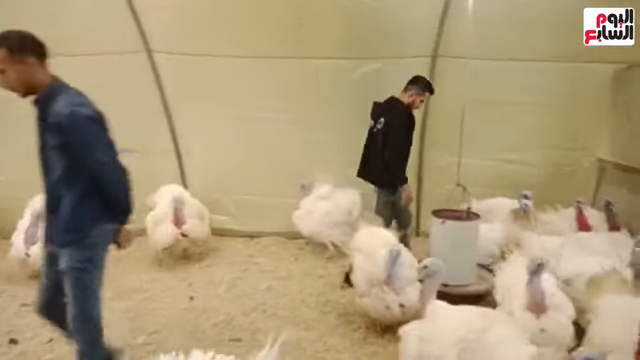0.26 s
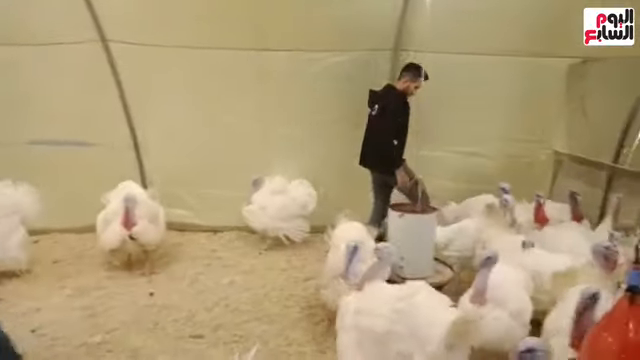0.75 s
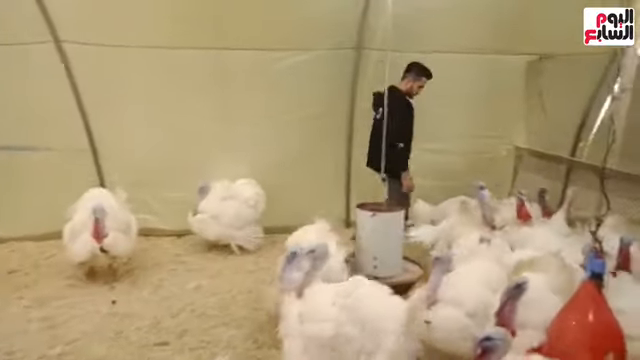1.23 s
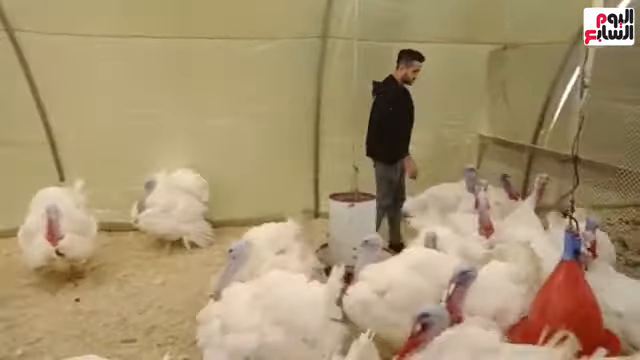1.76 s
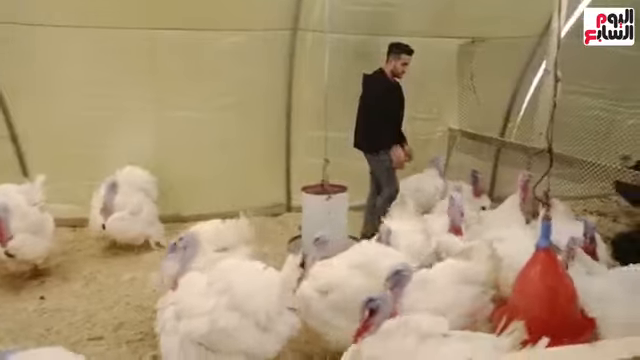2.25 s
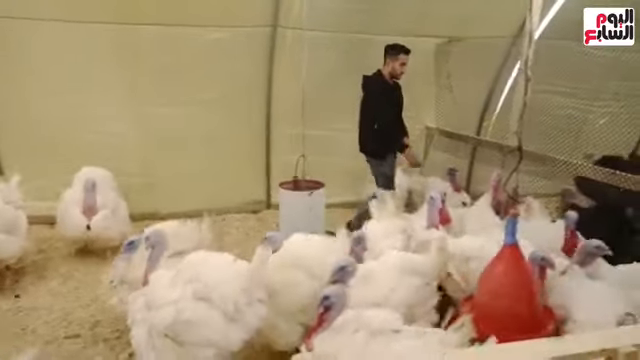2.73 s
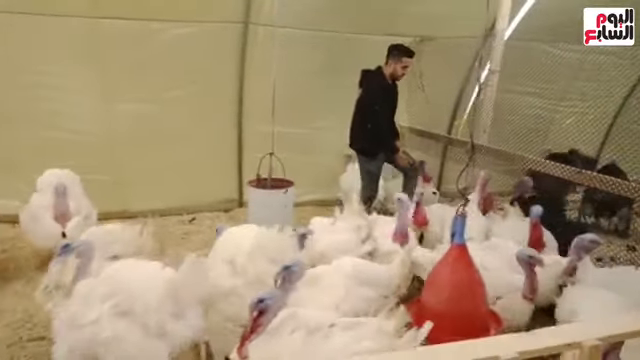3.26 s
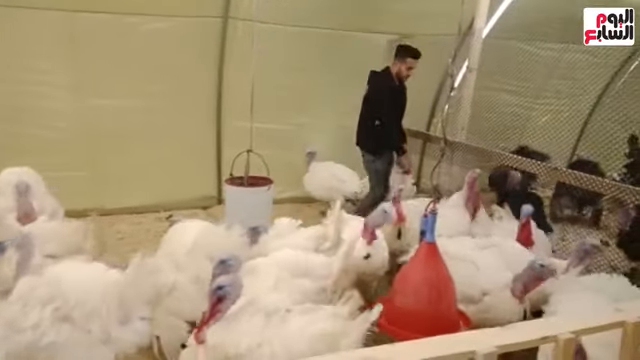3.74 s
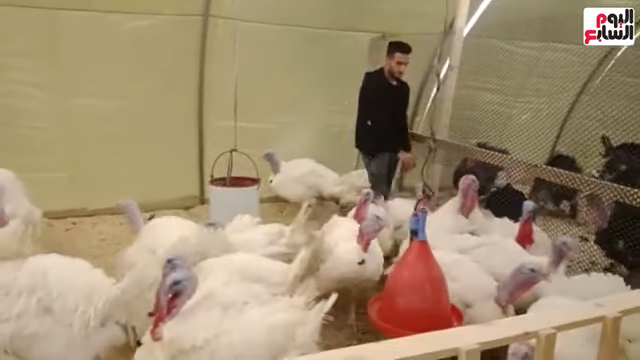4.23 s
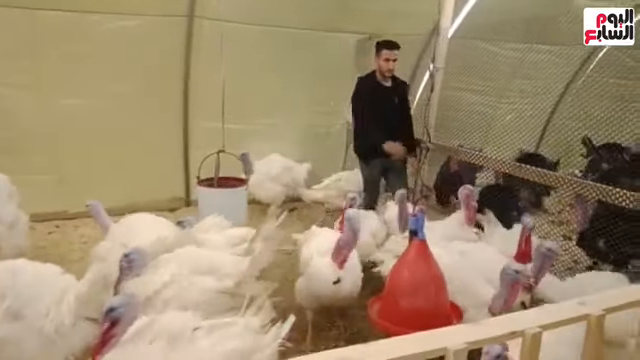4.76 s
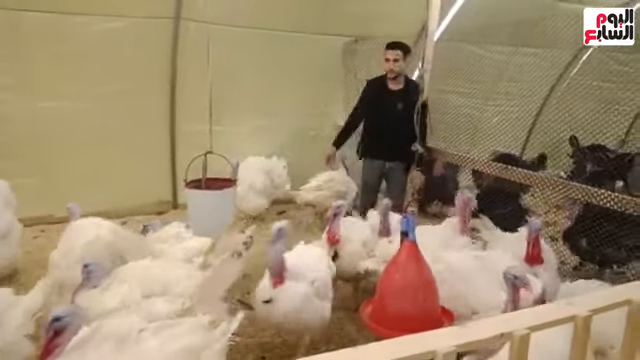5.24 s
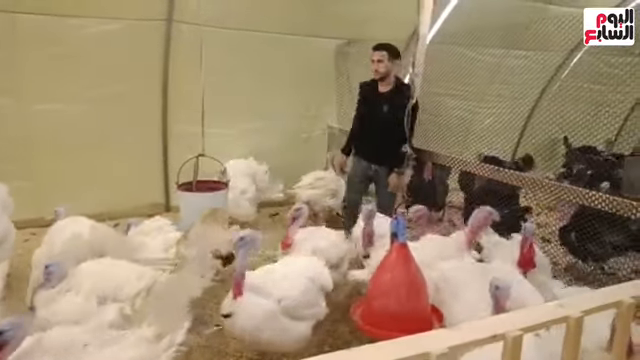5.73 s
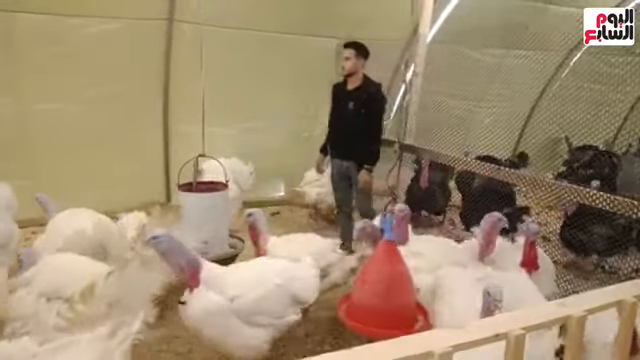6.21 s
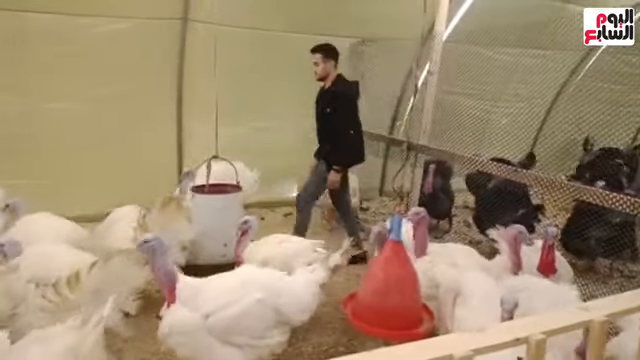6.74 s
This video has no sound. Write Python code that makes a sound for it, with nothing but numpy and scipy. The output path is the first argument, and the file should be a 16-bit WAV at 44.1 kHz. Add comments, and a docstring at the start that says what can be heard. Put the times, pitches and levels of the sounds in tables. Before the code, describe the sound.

Quiet first half: scattered turkey yelps and peeps, breathy spits from toms, soft low knocks, rumble and rustling. Then a wavering whistle, slightly left, triggers a sudden loud mass of throaty, bubbling gobbles with a harsh hissy edge. After a brief lull another whistle leads to a second surge, dying down to close peeps and a whine. Stereo microphone beside the pen, with short sparse shed echoes.

```python
"""A flock of turkeys in a plastic-roofed shed, heard from the edge of the pen.
Over a low rumble, a soft rustle and faint far calls, birds yelp and peep, toms spit and dull bumps knock.
A thin gliding whistle begins at 2.9 s and the flock gobbles from 3.4 s; a second begins at 5.2 s and
it gobbles again. Voices are sums of gliding harmonics, spits and bumps damped or resonant noise and tone,
whistles single wavering tones; sparse random echoes stand for the shed."""
import sys
import numpy as np
from scipy import signal
from scipy.fft import rfft, irfft, next_fast_len
from scipy.io import wavfile
from scipy.ndimage import uniform_filter1d, minimum_filter1d

SR = 44100
rng = np.random.default_rng(int(sys.argv[2]) if len(sys.argv) > 2 else 0)


def unload_audio(sound):
    """Save the sound as a 16-bit wav file, at the path given as the first command line argument."""
    columns = np.transpose(np.atleast_2d(sound))
    # keep every value between -1 and 1, then stretch to whole-number steps
    steps = np.round(np.clip(columns, -1, 1) * 32767)
    wavfile.write(sys.argv[1], SR, steps.astype(np.int16))


N = 307818
TIME = np.arange(N) / SR

# Frequency bands of the massed voice: fundamentals, throat ring, lower, middle and upper rasp.
# Each row: lower edge and upper edge in Hz.
REGISTERS = [(410, 805), (825, 1420), (1520, 2100), (2200, 3300), (3400, 4600)]
# Balance of those bands. Each row: level in dB relative to the surge, share of the surge's brightness,
# left over right in dB.
REGISTER_MIX = [(-2.5, -0.19, -2), (-0.5, 0.35, -1), (-11, 1, -3), (-12, 0.52, -7), (-24.5, 0.98, -8)]


def crowd(hiss_db=-8, patchy_db=4):
    """Subband envelope shaping: the massed gobble is split into registers, each following the surges."""
    voices = gobblers(count=12)
    voices = evened(voices + amp(-16) * shed(voices))
    voices += amp(-44) * noise_pair(N, .4)
    out = np.zeros((2, N))
    for band, (level_db, bright_share, pan_db) in zip(REGISTERS, REGISTER_MIX):
        bandpass = signal.butter(3, band, "bandpass", fs=SR, output="sos")
        part = signal.sosfiltfilt(bandpass, voices)
        part = part / part.std(1, keepdims=True) * sides(pan_db)
        # level the band's own slow swells, then impose those of the surges
        power = uniform_filter1d(uniform_filter1d((part ** 2).mean(0), size=1800), size=1100)
        part *= amp(level_db) * surging(bright_share) / np.sqrt(abs(power) + 1e-9)
        out += part
    # a harsh hiss, patchy in time and frequency, rides on the top register (the last part)
    hiss_colour = [(2400, -28.0), (3300, -12.5), (4650, 3.5), (5200, -8.5), (5800, -13.5),
                   (6800, -32), (12000, -62)]  # (Hz, relative dB)
    hiss = coloured(noise_pair(N, 0.25), hiss_colour)
    spectra = signal.stft(hiss, nperseg=512)[2]
    patches = uniform_filter1d(rng.standard_normal(spectra.shape[1:]), size=4, axis=0)
    patches = evened(uniform_filter1d(patches, size=6, axis=1))
    hiss = signal.istft(spectra * amp(patchy_db * patches), nperseg=512)[1][:, :N]
    pulses = np.sqrt(abs(uniform_filter1d((part ** 2).mean(0), size=900)))
    out += amp(hiss_db) * evened(hiss) * pulses * sides(-8.5)
    return ported(out)


# Surges of gobbling, as groups of toms set each other off.
# Each row: start in seconds, hold in seconds, level in dB, brightness in dB (shared out by register).
SURGES = [(3.365, 0.12, -30.5, 7.5), (3.559, 0.077, -21, 9.5), (3.659, 0.32, -18.5, 0),
          (3.951, 0.33, -20, -1), (4.176, 0.052, -21.5, -3), (4.271, 0.37, -21.5, -7.5),
          (4.459, 0.041, -20.5, 3.5), (4.684, 0.26, -22.5, -1.5), (4.892, 0.029, -19.5, 0),
          (5.003, 0.013, -17, -0.5), (5.108, 0.21, -25.5, -3), (5.415, 0.27, -28.5, 0.5),
          (5.72, 0.15, -23.5, 8), (5.886, 0.13, -19, 1), (6.042, 0.098, -16.5, 0.5),
          (6.138, 0.17, -21.5, 2.5), (6.362, 0.11, -22.5, -1.5), (6.572, 0.036, -30.5, -1.5),
          (6.95, .03, -34.5, 6.5)]


def surging(bright_share, rise_s=0.016, growth_db_per_s=0.5, release_db_per_s=163):
    """Power addition of envelopes: each surge rises fast, barely grows while held, then dies away."""
    power = np.zeros(N)
    for s, hold, db, bright_db in SURGES:
        first = round(s * SR)
        t = TIME[:N - first][:SR]
        change_db = growth_db_per_s * t - release_db_per_s * np.maximum(t - hold, 0)
        surge = np.minimum(t / rise_s, 1) * amp(db + bright_share * bright_db + change_db)
        power[first:first + len(t)] += surge ** 2
    return np.sqrt(power)


# Drift of the crowd's central pitch. Each row: time in seconds, pitch in Hz.
CROWD_PITCH = [(3.6, 611.8), (4.3, 543.6), (5.6, 573.8), (5.9, 618), (6.25, 626.3), (6.45, 555.4)]


def gobblers(count, bird_spread=0.0802, spread=0.125, syllables_per_s=22, uneven=.22, swoop=0.0893,
             timbre_db=3.5, pan_spread_db=1.0, lead_spread_ms=0.2, join_db=-24, join_spread_db=8):
    """Superposed voices: each tom rattles off gliding syllables; in the lulls the shy ones fade most."""
    out = np.zeros((2, N))
    length_s, loud_db = .04, 2.8
    excitement = surging(0)
    ranks = np.linspace(-1, 1, count)
    for voice, shyness in zip(ranks, rng.permutation(ranks)):
        draws = rng.standard_normal((90, 16))
        gaps = np.exp(uneven * draws[:, 0]) / syllables_per_s
        starts = SURGES[0][0] - .15 + np.cumsum(gaps)
        # a tom calls at full strength once the surge passes its own joining level
        joining = amp(join_db + join_spread_db * shyness)
        keenness = np.minimum(np.interp(starts, TIME, excitement) / joining, 1) ** 2
        for s, keen, draw in zip(starts, keenness, draws):
            _, long, high, rise, arch, loud, side, lead, *timbre = draw
            bend = swoop * np.array([-rise, arch / 2, rise])
            centre_hz = np.interp(s, *np.transpose(CROWD_PITCH))
            pitches = centre_hz * np.exp(bird_spread * voice + spread * high + bend)
            # a random level for each of the eight harmonics: some hollow, some ringing on an overtone
            harmonics_db = loud_db * loud + timbre_db * np.array(timbre)
            sound = note(length_s * np.exp(uneven * long), pitches, harmonics_db, pan_spread_db * side,
                         lead_spread_ms * lead, jitter=.007, rough=.1, fall_db=0)
            add(out, s, keen * sound)
    return out


# Short rising yelps, all alike in shape. Each row: start in seconds, pitch in Hz, level in dB.
YELPS = [(.002, 462, -27), (.587, 456, -34), (0.644, 442, -35.5), (1.028, 478, -41.5), (1.4, 512, -33.5),
         (1.709, 441, -30.5), (1.82, 505, -32), (3.236, 468, -28), (3.368, 479, -25)]
# Harmonics of a yelp, a weak fundamental under strong overtones: levels in dB added to the yelp's own.
YELP_HARMONICS_DB = [-16.5, -1.5, -3.5, -8, -28.5]
# Nearly pure peeps. Each row: start in seconds, length in seconds before the taper's stretch,
# pitch in Hz, level in dB, left over right in dB.
PEEPS = [(0.075, 0.026, 846, -37, 1), (0.332, 0.049, 883, -37.5, 5), (0.409, .047, 848, -37, 4),
         (0.511, 0.044, 1133, -36.5, -4), (0.763, 0.05, 831, -33.5, 8), (0.798, 0.033, 1180, -33.5, -3),
         (0.951, 0.037, 870, -36, 1), (1.78, 0.03, 925, -40.5, 4), (1.832, 0.033, 1188, -26, -2),
         (2.373, 0.039, 1010, -38.5, -1), (2.45, 0.039, 655, -36, 0), (2.451, 0.028, 1117, -36.5, 16),
         (2.604, 0.0284, 994, -37, 1), (2.756, 0.056, 1190, -39.5, -4), (2.898, 0.038, 820, -35, 3),
         (6.662, 0.023, 886, -25.5, -4), (6.658, 0.064, 1593, -32, -1), (6.842, 0.029, 828, -23.5, -1)]
# Reedy calls that slide in pitch. Each row: start in seconds, length in seconds,
# pitch in Hz at the start, middle and end, level in dB, overtone offset in dB, left over right in dB.
SLIDES = [(1.521, 0.12, 1390, 1080, 900, -38, -40, 2), (1.59, 0.096, 953, 855, 770, -40.5, 5, -2.5),
          (1.898, 0.056, 914, 877, 820, -42, 8, -8), (3.314, 0.074, 1034, 912, 950, -33, -4, -0.5),
          (5.013, 0.14, 1318, 1318, 890, -20, -33, 6.5)]
# Overtones of a sliding call from the second harmonic up: levels in dB added to its level and offset.
SLIDE_HARMONICS_DB = [2.5, -15.5, -29.5]
# One bird's reedy whine, broken into notes. Each row: start in seconds,
# length in seconds before the taper's stretch, pitch in Hz, level in dB.
WHINES = [(6.773, 0.12, 1019, -30.5), (6.9, 0.031, 980, -28), (6.951, 0.0153, 957, -22.5)]
# Harmonics of the whine: levels in dB added to the note's own.
WHINE_HARMONICS_DB = [2, -8.5, -15.5]
# Gobble syllables of the nearest toms. Each row: start in seconds, length in seconds before the taper's
# stretch, pitch in Hz, glide as a share of the pitch, throat resonance in octaves above the pitch,
# level in dB of the strongest harmonic, left over right in dB, lead of the left ear in ms.
SYLLABLES = [(3.377, 0.014, 477, -0.069, 2.33, -23.5, -4, 0.042),
             (3.422, 0.023, 505, 0.39, 1.55, -22, 9, 0.17), (3.433, 0.023, 620, 0.21, 0.67, -11, -2, -0.22),
             (3.447, 0.053, 662, -0.02, .03, -10.5, -7, 0.11),
             (3.509, 0.025, 595, -0.13, 1.85, -23.5, -2.5, -0.11),
             (3.534, 0.043, 507, -0.24, 1.55, -18.5, -4.5, -0.23),
             (3.551, 0.034, 568.6, -0.51, 0.49, -17.5, -2.5, -0.47),
             (3.571, 0.03, 619, -0.049, 1, -17, 0, -0.21),
             (3.597, 0.037, 611.6, 0.11, 1.2, -12.5, 0.5, -0.1),
             (3.655, 0.033, 616, 0.34, .27, -16, -1.5, -0.2),
             (3.693, 0.061, 732, 0.134, 0.38, -21.5, 0.5, -0.042),
             (3.73, 0.033, 561, -.08, 2, -24, -2, 0.095),
             (3.775, 0.018, 584, -0.03, .45, -17, -4.5, -0.024),
             (3.943, 0.016, 654, -0.013, 1.6, -21.5, -2.5, 0.12),
             (3.979, 0.024, 595, -0.16, .15, -16, -7, -0.095),
             (4.237, 0.041, 619, -0.028, 1, -16, -5, -0.26),
             (4.467, 0.025, 591, 0.12, 0.65, -17.5, -2, 0.033),
             (4.708, 0.037, 534.3, -0.29, 0.042, -15.5, -8.5, -0.18),
             (4.718, 0.065, 493, 0.18, 2.38, -30.5, -6, 0.075),
             (4.795, 0.025, 545, -0.066, 0.45, -13, -6.5, 0.25),
             (4.815, 0.034, 589, 0.13, 1.14, -17.5, -5, 0.15),
             (4.887, 0.021, 563, 0.17, 1.6, -17, -1.5, 0.16),
             (4.93, 0.032, 606, -0.11, 1.1, -11, -1.5, 0.085),
             (4.997, 0.016, 610, -0.031, 0.67, -10.5, -1, 0.19),
             (5.014, 0.014, 650, 0.42, .2, -20, 10, 0.034), (5.021, .04, 521, -0.28, 1, -23.5, -14, 0.25),
             (5.291, 0.026, 543, -0.23, 0.57, -12.5, -5, -0.31),
             (5.337, 0.02, 546, -0.4, .03, -18, -3, 0.022),
             (5.395, 0.032, 586, -0.42, 0.22, -13, -4.5, 0.07),
             (5.598, 0.033, 513.5, 0.11, .72, -11, -3, -0.45),
             (5.631, 0.052, 543, -0.03, 0.05, -13.5, -2, -0.21),
             (5.727, 0.026, 562, -0.35, .05, -11.5, -5.5, -0.097),
             (5.767, 0.03, 650, 0.0085, .84, -11.5, 18, -0.27),
             (5.793, 0.028, 839, -0.26, .15, -13.5, 4.5, -0.25),
             (5.815, 0.016, 520, 0.14, 1.67, -12, -9.5, -0.39),
             (5.865, 0.029, 584, 0.4, 1.5, -20.5, -7, -0.12), (5.873, 0.025, 581, 0.22, 1, -8, -3, 0.39),
             (5.922, 0.026, 666.5, 0.095, 0.5, -9, 5.5, 0.038),
             (5.964, .034, 600, 0.17, 1.22, -24, 2, -0.079), (6.067, 0.013, 684, 0.12, .6, -19, 0.5, 0.015),
             (6.083, .04, 626.4, -0.11, .9, -13.5, -2, 0.19),
             (6.197, 0.043, 548, 0.23, 1.1, -16.5, -10, 0.1),
             (6.311, 0.021, 607, -0.08, 0.66, -18.5, 19, .05),
             (6.403, 0.029, 617, 0.086, 1.11, -12, -2.5, 0.14),
             (6.578, 0.022, 480.5, 0.25, 0.58, -23, -2.5, 0.32)]


def near_birds(wet_db=-13, overtone_db=-22, yelp_pan_db=0.0, whine_pan_db=-7, whine_glide=-0.064):
    """Harmonic synthesis: yelps, peeps, slides, whines and gobble syllables that stand out."""
    out = np.zeros((2, N))
    yelp_s, yelp_glide = 0.0221, 0.28  # length before the stretch; rise as a share of the pitch
    for s, hz, db in YELPS:
        harmonics_db = db + np.array(YELP_HARMONICS_DB)
        # unsteady cycles make a yelp raspy
        add(out, *syllable(s, yelp_s, hz, yelp_glide, harmonics_db, yelp_pan_db, jitter=0.045))
    for s, length, hz, db, pan_db in PEEPS:
        glide = -2.8 * length  # longer peeps fall further
        add(out, *syllable(s, length, hz, glide, [db, db + overtone_db], pan_db))
    for s, length, *pitches, db, reed_db, pan_db in SLIDES:
        harmonics_db = db + np.append(0, reed_db + np.array(SLIDE_HARMONICS_DB))
        add(out, s, note(length, pitches, harmonics_db, pan_db, lead_ms=0.31,
                         jitter=0.0099, rough=0.27, fall_db=22.5))
    for s, length, hz, db in WHINES:
        harmonics_db = db + np.array(WHINE_HARMONICS_DB)
        add(out, *syllable(s, length, hz, whine_glide, harmonics_db, whine_pan_db))
    for s, length, hz, glide, octaves, db, pan_db, lead_ms in SYLLABLES:
        add(out, *syllable(s, length, hz, glide, db + throat(octaves), pan_db, lead_ms))
    return out + amp(wet_db) * shed(out)


def throat(octaves, count=6, fall_db_per_octave=34.5):
    """Formant principle: the harmonic nearest the throat resonance rings loudest (0 dB)."""
    db = -fall_db_per_octave * abs(np.log2(np.arange(count) + 1) - octaves)
    return db - db.max()


def syllable(s, length, hz, glide, harmonics_db, pan_db, lead_ms=-0.21, stretch=1.2, arch_per_s=0.91,
             jitter=.015):
    """Arched glide: a near bird's start time and note; long notes arch more."""
    sag = arch_per_s * length
    pitches = hz * np.array([1 - glide / 2 - sag, 1, 1 + glide / 2 - sag])
    start = s - length * (stretch - 1) / 2  # the stretch makes room for the taper on both sides
    return start, note(length * stretch, pitches, harmonics_db, pan_db, lead_ms,
                       jitter=jitter, rough=0.17, fall_db=22.5)


def note(length, pitches, harmonics_db, pan_db, lead_ms, jitter, rough, fall_db, top_hz=4200):
    """Fourier synthesis: harmonics of an arched pitch with unsteady cycles and a high cutoff."""
    n = int(length * SR)
    arch = np.polyfit([0, .5, 1], pitches, 2)
    hz = np.polyval(arch, np.arange(n) / n)
    turns = np.cumsum(hz * (1 + jitter * wander(n, 484.6))) / SR
    turns = np.array([turns, turns - hz * lead_ms / 1000])  # left, right
    k = np.arange(1, 9)
    # harmonics beyond those given fall by fall_db each
    db = np.concatenate([harmonics_db, harmonics_db[-1] - fall_db * k])[:len(k)]
    gains = amp(db) / np.sqrt(1 + (k * pitches[1] / top_hz) ** 20)
    voice = np.sin(2 * np.pi * (turns[..., None] * k + rng.random(len(k)))) @ gains
    envelope = (1 + rough * wander(n, 400)) * signal.windows.tukey(n, .8)
    return np.sqrt(2) * voice * envelope * sides(pan_db)


# Two whistles, one list each.
# Each row: time in seconds, pitch in Hz, level in dB before the overall whistle gain.
WHISTLES = [
    [(2.93, 3600, -60), (2.965, 3560, -40), (2.998, 3600, -32.5), (3.055, 3810, -35.5), (3.1, 3680, -34.5),
     (3.115, 3380, -48), (3.168, 3470, -42), (3.19, 3930, -26), (3.232, 4210, -50), (3.275, 3900, -34),
     (3.33, 3825, -23), (3.4, 3410, -38), (3.504, 3640, -40), (3.58, 3645, -47), (3.71, 3790, -35.5)],
    [(5.15, 3220, -23.5), (5.175, 3380, -33.5), (5.213, 3930, -42), (5.29, 4050, -39.5),
     (5.355, 3974, -28.5), (5.603, 4048, -32), (5.69, 3820, -26), (5.735, 3040, -37.5)],
]


def whistles(level_db=3.0, waver=0.0067, flutter=.22, wet_db=-12, lead_ms=-0.32, airy_db=-52, airy_hz=800):
    """Frequency and amplitude modulation: thin quavering tones with a fringe of air noise around them."""
    out = np.zeros((2, N))
    for whistle in WHISTLES:
        s, pitch_hz, db = np.transpose(whistle)
        t = np.arange(s[0], s[-1], 1 / SR)
        hz = uniform_filter1d(np.interp(t, s, pitch_hz), size=700)
        hz = hz * (1 + waver * wander(len(t), 250))
        turns = np.cumsum(hz) / SR
        turns = np.array([turns, turns - hz * lead_ms / 1000])  # left, right
        strength = amp(np.interp(t, s, db)) * (1 + flutter * wander(len(t), 70))
        strength = strength + amp(airy_db) * wander(len(t), airy_hz)
        strength = strength * signal.windows.tukey(len(t), .06)
        add(out, t[0], np.sqrt(2) * strength * np.sin(2 * np.pi * turns) * sides(-7.0))
    return amp(level_db) * (out + amp(wet_db) * shed(out))


# Spits of strutting toms and feather swishes. Each row: start in seconds, level in dB,
# rise in seconds, hold in seconds, decay time constant in seconds.
SPITS = [(0.254, -30.5, 0.025, 0.0093, 0.0034), (0.802, -45.5, 0.014, 0.0044, 0.051),
         (1.302, -47.5, 0.0044, .005, 0.096), (1.442, -47.5, 0.0052, .005, 0.03),
         (1.937, -35, 0.019, 0.025, 0.017), (2.275, -46.5, 0.0031, .005, 0.024),
         (2.469, -35.5, 0.019, 0.0096, 0.019)]
# Spectrum of the spat air. Each row: frequency in Hz, relative density in dB per Hz.
SPIT_COLOUR = [(1000, -28), (1600, -10), (3300, -11.5), (5000, -20.5), (6200, -33.5), (7000, -50),
               (10000, -50.5)]
# Resonances of the throat and beak. Each row: frequency in Hz, width in Hz, level in dB beside the air.
SPIT_RINGS = [(1630, 180, -0.5), (2280, 810, -2.5), (3450, 410, -1)]


def spits(wet_db=-9, grain=0.14, grains_per_s=360):
    """Source and filter: sputtering air noise excites resonances; each puff swells, holds and decays."""
    out, t = np.zeros((2, N)), np.arange(SR // 4) / SR
    for s, db, rise, hold, decay in SPITS:
        air = coloured(noise_pair(len(t), 0.82), SPIT_COLOUR)
        air = air * (1 + grain * wander(len(t), grains_per_s))
        puff = air.copy()
        for hz, width, ring_db in SPIT_RINGS:
            puff += amp(ring_db) * signal.lfilter(*signal.iirpeak(hz, hz / width, SR), air)
        shape = np.minimum(t / rise, 1) * np.exp(-np.maximum(t - rise - hold, 0) / decay)
        add(out, s, amp(db) * evened(puff) * shape * sides(-8.0))
    return out + amp(wet_db) * shed(out)


def tick(s=5.815, db=-56, width_s=0.016):
    """Exponential envelope on white noise: a faint bright crackle during the second gobbling."""
    return amp(db) * noise_pair(N, .6) * np.exp(-abs(TIME - s) / width_s)


# Soft low bumps. Each row: start in seconds, peak level in dB of the swing's envelope, pitch in Hz,
# decay in seconds (the envelope peaks at half of it).
BUMPS = [(0.206, -23, 159, 0.0074), (0.527, -17, 184, 0.011), (0.729, -22, 89, 0.031),
         (0.79, -15.5, 138, 0.013), (0.865, -19, 90, 0.012), (0.894, -16, 132.6, 0.013),
         (1.223, -24.5, 106, 0.016), (2.066, -29.5, 142, 0.016), (4.39, -25, 149, 0.0043)]


def bumps(scuff_db=-7, wet_db=-12):
    """Heavily damped oscillation: dull knocks, each a low swing with a soft noise scuff."""
    out, t = np.zeros((2, N)), np.arange(SR // 4) / SR
    scuff_colour = [(30, -25.5), (80, 0.5), (220, -3.0), (400, -18.0), (4000, -79.5)]  # (Hz, relative dB)
    for s, db, hz, decay in BUMPS:
        scuff = evened(coloured(noise_pair(len(t), 0.27), scuff_colour))
        shape = t / (decay / 2) * np.exp(1 - t / (decay / 2))
        knock = np.sin(2 * np.pi * hz * t) + amp(scuff_db) * scuff
        add(out, s, amp(db) * shape * knock * sides(-6))
    return out + amp(wet_db) * shed(out)


def far_birds(count=140, level_db=-50.5):
    """Random superposition: faint clucks and yelps scattered evenly in time and from side to side."""
    out = np.zeros((2, N))
    for when, high, rise, loud, side in rng.random((count, 5)):
        glide = 0.35 * (rise - .5) * np.array([-1, 0, 1])
        pitches = (400 + 240 * high) * (1 + glide)
        harmonics_db = np.array([-5, 0, -8]) + 6 * loud
        add(out, when * N / SR, note(.04, pitches, harmonics_db, 10 * (side - .5), side - .5,
                                     jitter=.02, rough=.25, fall_db=6))
    return amp(level_db) * (out + .5 * shed(out))


# Course of the rumble. Each row: time in seconds, mean level in dB.
RUMBLE = [(0, -33), (.9, -34), (2.8, -38), (3.1, -32.5), (3.6, -42.5), (4.7, -38), (5.7, -38), (7, -45.5)]
# Spectrum of the rumble. Each row: frequency in Hz, relative density in dB per Hz.
RUMBLE_COLOUR = [(20, -35.5), (45, -17.5), (65, -5.5), (85, 2), (105, -7), (170, -8), (250, -15.5),
                 (400, -39.5), (900, -44)]
# Spectrum of the rustle. Each row: frequency in Hz, relative density in dB per Hz.
RUSTLE_COLOUR = [(150, -15), (400, 2), (900, -4.5), (1450, -16.5), (2000, -10.5), (3700, -19), (5000, -33),
                 (6500, -40.5), (15000, -47)]


def background(lumps_db=2.5, rustle_db=-42.5, stir_db=1.36, rumble_pan_db=-4, rustle_pan_db=-3.0):
    """Filtered noise: a lumpy low rumble and the steady soft rustle of birds on litter."""
    level_db = np.interp(TIME, *np.transpose(RUMBLE)) + lumps_db * wander(N, 28)
    rumble = evened(coloured(noise_pair(N, 0.89), RUMBLE_COLOUR + [(4000, -93)]))
    rumble = rumble * amp(level_db) * sides(rumble_pan_db)
    rustle = evened(coloured(noise_pair(N, .5), RUSTLE_COLOUR))
    rustle = rustle * amp(rustle_db + stir_db * wander(N, 8.6)) * sides(rustle_pan_db)
    return rumble + ported(rustle)


# Reverberation of the shed. Each row: frequency in Hz, time in seconds to decay by 60 dB.
SHED = [(200, 0.27), (1000, 0.1), (3000, 0.13), (8000, 0.017)]


def shed(x):
    """Reverberation by convolution: sparse taps of random sign, each band dying at its own speed."""
    taps = rng.choice([-1., 1.], (2, SR // 2)) * (rng.random((2, SR // 2)) < 1 / 20)
    taps[:, :SR // 200] = 0  # no echo in the first 5 ms
    hz, t, z = signal.stft(taps, SR, nperseg=256)
    fading = amp(-60 * t / read(SHED, hz)[:, None])
    tail = signal.istft(z * fading, SR, nperseg=256)[1]
    return signal.fftconvolve(x, tail / np.linalg.norm(tail[0]), axes=1)[:, :N]


# Phase between the ears for sound from across the shed.
# Each row: frequency in Hz, radians by which the left ear leads.
PORT_PHASE = [(450, 0.06), (800, 0.14), (1050, 2.66), (1720, 3.94), (2000, 7.55), (2950, 7.93), (3200, 9),
              (3900, 11.15)]


def ported(x):
    """Interaural phase: sound from across the shed reaches the two ears out of step."""
    lag = read(PORT_PHASE, np.fft.rfftfreq(N, 1 / SR))
    return np.array([x[0], irfft(rfft(x[1]) * np.exp(-1j * lag), N)])


def amp(db):
    """Logarithmic level: decibels to gain."""
    return 10 ** (np.asarray(db) / 20)


def evened(x):
    """Root mean square: scales to rms 1."""
    return x / np.sqrt(np.mean(x ** 2) + 1e-20)


def read(points, hz):
    """Log-frequency interpolation of a spectrum table."""
    f, value = np.transpose(points)
    return np.interp(np.log(hz + 1), np.log(f + 1), value)


def coloured(x, points):
    """Spectral multiplication: filters by a table of Hz and dB."""
    n = x.shape[-1]
    size = next_fast_len(n)
    gain = amp(read(points, np.fft.rfftfreq(size, 1 / SR)))
    return irfft(rfft(x, size) * gain, size)[..., :n]


def wander(n, hz):
    """Slow random modulation: straight lines between normal draws, hz of them a second."""
    at = np.arange(n) * hz / SR
    return np.interp(at, np.arange(1024), rng.standard_normal(1024))


def noise_pair(n, same):
    """Interaural correlation: noise for two ears, alike to the degree `same`."""
    a, b = rng.standard_normal((2, n))
    same = np.clip(same, -1, 1)
    return np.array([a, same * a + np.sqrt(1 - same ** 2) * b])


def sides(pan_db):
    """Interaural level difference: left and right gains of mean power 1."""
    return evened(amp([[pan_db], [0]]))


def add(mix, s, sound):
    """Superposition: mixes a stereo sound in at time s."""
    part = mix[:, max(round(s * SR), 0):][:, :sound.shape[1]]
    part += sound[:, :part.shape[1]]


def scene():
    """Linear superposition of all the sounds."""
    birds = crowd() + near_birds() + spits() + far_birds()
    return birds + whistles() + tick() + bumps() + background()


def record(dry, edge_hz=15600):
    """Peak limiting by a smoothed gain, then a linear-phase low-pass."""
    gain = np.minimum(1, .93 / (abs(dry).max(0) + 1e-9))
    gain = uniform_filter1d(minimum_filter1d(gain, size=301), size=301)
    lowpass = signal.firwin(511, edge_hz, window=("kaiser", 9), fs=SR)
    return signal.oaconvolve(dry * gain, lowpass[None], "same")


dry = scene()
out = record(dry)
unload_audio(out)
```